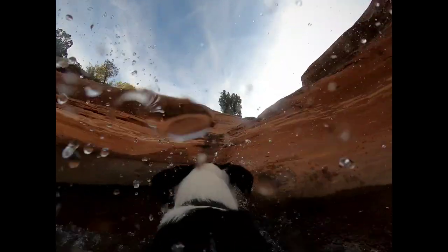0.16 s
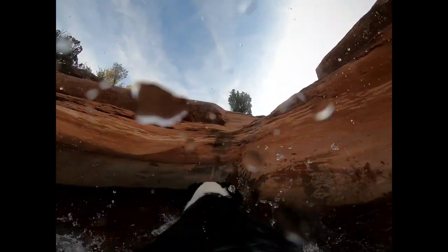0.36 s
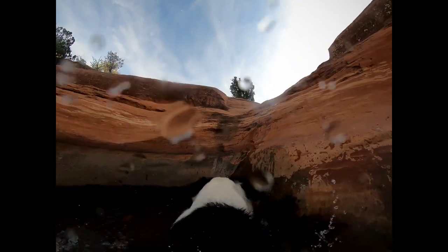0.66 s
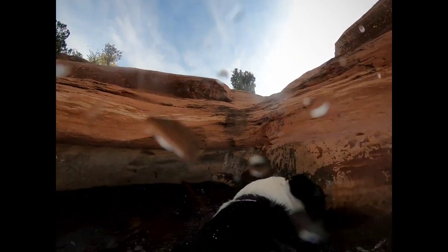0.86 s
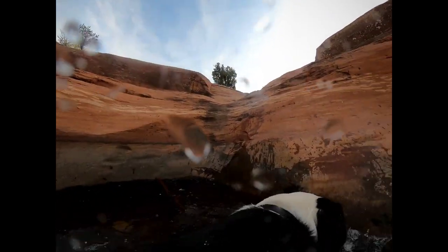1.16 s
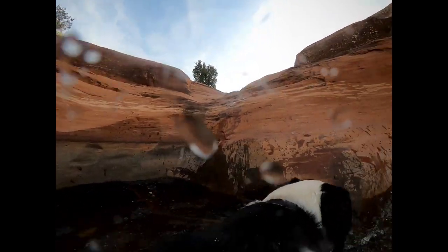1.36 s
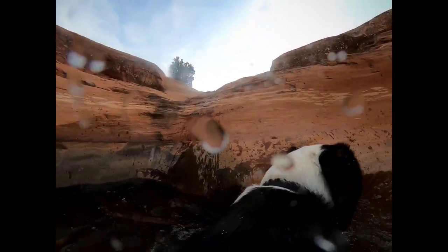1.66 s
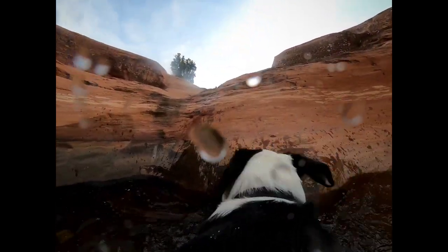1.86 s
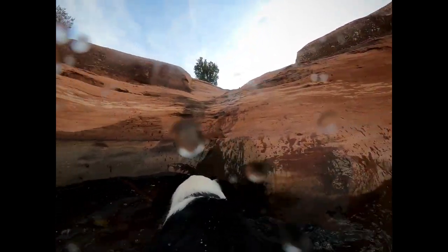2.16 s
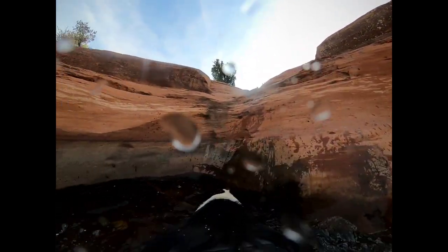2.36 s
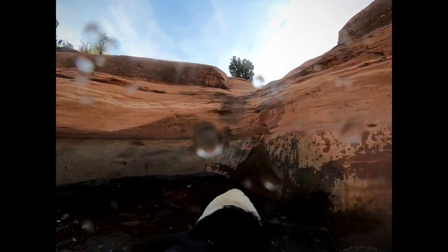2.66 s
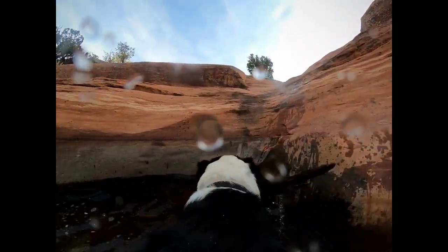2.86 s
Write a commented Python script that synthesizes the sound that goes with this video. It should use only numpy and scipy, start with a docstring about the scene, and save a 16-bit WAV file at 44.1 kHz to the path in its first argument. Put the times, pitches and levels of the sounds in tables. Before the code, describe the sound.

A big close splash as a dog plunges into a rock pool, heavy slaps and spray, then a wet squelch covers the microphone; dull patter fades into soft sloshes, trickles and gurgling bubbles.

```python
"""A dog with a camera on its back plunges into a rock pool: bubbles, fizz and noise crash as spray,
ringing slaps and drops land on top, and low noise buffets the microphone ports.
At 0.72 s a slug of water hits the ports with a squelch, chirp and click, and the crash gives way to dull patter.
The dog then paddles on: swells of slosh, a trickle, and single gliding sines for gurgling bubbles.
Late on, the treble grows wide and in opposite phase at the two ports; a faint drone and hiss lie below."""
import sys
import numpy as np
from scipy.fft import rfft, irfft, next_fast_len
from scipy.io import wavfile
from scipy.ndimage import map_coordinates

SR = 44100
rng = np.random.default_rng(int(sys.argv[2]) if len(sys.argv) > 2 else 0)


def transcribe(u):
    """Save the signal u as a 16-bit wav file named by the first command-line argument.

    u: samples, shape (n,) or (channels, n), limited to [-1, 1]; the rate is SR.
    q: integer samples, one column per channel.
    """
    v = np.clip(np.atleast_2d(u).T, -1, 1)
    q = np.round(v * 32767).astype(np.int16)
    wavfile.write(sys.argv[1], SR, q)


N = 132300
T = np.arange(N) / SR  # s
FLOOD_S, CLOSE_S = 0.7225, 0.0035  # water covers the ports; time scale of their closing
# stereo width of the treble: [t/s, level of the side signal's gain/dB]
WIDTH = [(.1, -12), (.15, -9), (.45, -12), (.69, -18), (.75, -3), (1.0, 0), (1.35, -14), (1.7, -34),
         (2.11, -48.5), (2.16, -12), (2.4, 5), (3, 9)]


def amp(db):
    """Decibels to amplitude."""
    return 10 ** (np.asarray(db) / 20)


def unit(x):
    """x at rms 1."""
    return x / np.sqrt(np.mean(x ** 2) + 1e-20)


def curve(rows, axis=1):
    """One column of a table, drawn as straight lines over time."""
    rows = np.array(rows)
    return np.interp(T, rows[:, 0], rows[:, axis])


def wobble(rate):
    """A smooth random curve with rate random points per second."""
    return map_coordinates(rng.standard_normal(4000), [T * rate + 2], mode="wrap")


def filtered(x, response):
    """x times a response of frequency, padded so that the end does not wrap round."""
    m = next_fast_len(N + SR // 2)
    hz = np.fft.rfftfreq(m, 1 / SR)
    return irfft(rfft(x, m) * response(hz), m)[..., :N]


def coloured(x, points):
    """x through an equaliser curve of (Hz, dB) points, at rms 1."""
    f, db = np.transpose(points)
    return unit(filtered(x, lambda hz: amp(np.interp(np.log(hz + 1), np.log(f), db))))


def noise(points):
    """White noise through an equaliser curve, at rms 1."""
    return coloured(rng.standard_normal(N), points)


def ports(mid, side):
    """Left and right ports: the bass reaches both alike, only the treble parts them."""
    wide_hz = 1160  # the ports differ above this
    right_lean = 0.067  # share of the treble that shifts to the right port
    side = filtered(side + right_lean * mid, lambda hz: 1 - 1 / (1 + (hz / wide_hz) ** 20))
    return np.array([mid - side, mid + side])


def swell(start, length):
    """Rises to 1 in length seconds and dies away."""
    u = np.maximum(T - start, 0) / max(length, 1e-4)
    return (u * np.exp(1 - u)) ** 2


def bubble(start, hz, length, rise, rough=0):
    """A ringing air pocket, its pitch gliding by rise octaves/s; roughness flutters its level and phase."""
    octaves = rise * np.clip(T - start, 0, 4 * length)
    phase = 2 * np.pi * np.cumsum(hz * 2 ** octaves * (T > start)) / SR
    level = swell(start, length)
    if rough:
        # a new random value every four cycles
        size, slip = (np.interp(T * hz / 4, np.arange(4000), rng.standard_normal(4000)) for _ in range(2))
        level = level * (1 + rough * size)
        phase = phase + rough * slip
    return level * np.sin(phase)


def froth(count, low_hz, high_hz, cycles, spread_db, rise):
    """A cloud of small rising bubbles of uneven size, each ringing down over some cycles."""
    when, pitch, size, life = rng.random((count, 4)).T[..., None]
    hz = low_hz * (high_hz / low_hz) ** pitch
    t = np.arange(1600) / SR
    u = t * hz / (cycles * (.5 + life))  # 1 where the ring is 60 dB down
    decay = np.exp(-np.log(1000) * u)
    attack = 1 - np.exp(-t * hz * 2)
    rings = decay * attack * np.sin(2 * np.pi * hz * t * (1 + rise * u))
    rings *= hz * amp(-spread_db * np.log(np.maximum(size, .02)))
    at = (when * N).astype(int) + np.arange(len(t))
    return unit(np.bincount(at.ravel(), rings.ravel(), N)[:N])


def water(colour, grains, noise_db):
    """Bubbles on a bed of rushing noise, at rms 1."""
    return unit(coloured(grains, colour) + amp(noise_db) * noise(colour))


def covered():
    """0 while the ports are open, 1 once water covers them."""
    return .5 + .5 * np.tanh((T - FLOOD_S) / CLOSE_S)


def crash():
    """The plunge throws up water that falls back as large bubbles, fine fizz and spray."""
    # faders before trim: [t/s, body level/dB, spray level/dB]
    faders = [(0.0, -21, -49), (0.064, -19, -42), (0.074, -28.5, -44.5), (0.09, -29, -42.5),
              (0.116, -27, -49), (0.234, -26.5, -37), (0.32, -23.5, -45.5), (0.462, -29, -49.5),
              (0.56, -25, -47.5), (0.645, -31.5, -48), (0.71, -29.5, -53.5)]
    # equaliser of the body: [f/Hz, level/dB]
    body_colour = [(71, -39), (120, -15.5), (156, -3.5), (224, -11.5), (372, -9), (524, -9.5),
                   (1130, -10.5), (1470, -17), (6420, -32.5), (15000, -60.5)]
    # equaliser of the spray: [f/Hz, level/dB]
    spray_colour = [(1500, -36), (3500, 5), (6500, -2.5), (9000, -7), (13000, -20), (15000, -29)]

    def body():
        large = froth(count=5000, low_hz=176.6, high_hz=3460, cycles=38, spread_db=1.5, rise=0.26)
        fizz = froth(count=3600, low_hz=1532, high_hz=11030, cycles=10.9, spread_db=1.5, rise=0.087)
        return water(body_colour, large + amp(0.5) * fizz, noise_db=-3)

    def spray():
        fine = froth(count=5000, low_hz=2940, high_hz=12900, cycles=2, spread_db=2.5, rise=.1)
        return water(spray_colour, fine, noise_db=1.5)

    body_gain = amp(curve(faders) - 0.96)
    spray_gain = amp(curve(faders, axis=2) - 5)
    mid = body_gain * body() + spray_gain * spray()
    side = amp(curve(WIDTH)) * body_gain * body() + amp(-1) * spray_gain * spray()
    return (1 - covered()) * ports(mid, side)


def slaps():
    """Closing cavities thump; the more abrupt the slap, the more it splatters."""
    # heavy slaps of water: [t/s, f/Hz, thump level/dB, swell/s]
    hits = [(0.037, 221, -14, 0.0089), (0.054, 470, -5, 0.0007), (.061, 294, -8.5, 0.0042),
            (.067, 470, -10.5, 0.00066), (0.065, 127, -8.5, 0.0043), (0.309, 155.7, -16.5, 0.012),
            (2.382, 348, -25, 0.0021)]
    splatter_colour = [(80, -9.0), (300, -8.5), (900, 9.0), (2500, -12.5), (9000, -43.0)]  # [f/Hz, level/dB]
    thump = sum(amp(db) * bubble(s, hz, length, rise=3.6) for s, hz, db, length in hits)
    bursts = sum(amp(db) * swell(s, length) / (1 + length / 0.0026) for s, hz, db, length in hits)
    return thump + amp(-10.5) * bursts * noise(splatter_colour)


def buffet():
    """Waves shove each port separately; gentle pressure reaches both more alike."""
    # water pushing on the ports: [t/s, level/dB]
    shove = [(0, -33.5), (.06, -24), (.105, -31.5), (.155, -18.5), (.19, -27), (.228, -11), (.275, -30),
             (.42, -46.5), (.755, -46.5), (.79, -59), (1.5, -76), (1.56, -52), (1.66, -60), (2.58, -54.5),
             (2.645, -44), (2.69, -45), (3, -52.5)]
    # equaliser of the push: [f/Hz, level/dB]
    colour = [(12, -8.5), (25, 2), (42, -6.5), (66, 1.5), (130, -11), (250, -16.5), (600, -45), (1500, -90)]
    level_db = curve(shove)
    apart = np.clip((level_db + 51) / 28, .1, .95)
    own = np.array([noise(colour) for _ in range(2)])
    shared = noise(colour)
    return amp(level_db) * (apart * own + np.sqrt(1 - apart ** 2) * shared)


def flood():
    """A slug of water seals the ports: an opposite-phase squelch and chirp, a click, a push on the right."""
    shut = FLOOD_S + 0.001656
    closing = np.exp(np.minimum(T - shut, 0) / 0.00074 - (np.maximum(T - shut, 0) / 0.00055) ** 2)
    chirp_hz = 1300 + 600 * (T > shut - .0003)
    chirp = amp(-0.5) * closing * np.sin(2 * np.pi * np.cumsum(chirp_hz) / SR)
    squelch_colour = [(900, -18.0), (1200, 4.5), (1600, -10.5), (3000, -15.0), (6000, -56.5)]  # [f/Hz, level/dB]
    squelch = amp(-18.5) * np.exp(-abs(T - shut) / 0.0082) * noise(squelch_colour)
    click = amp(-10.5) * (swell(shut - .0003, .0001) - swell(shut, .0001))
    push = amp(-3) * bubble(shut + 0.000058, 120, 0.003, rise=-33)
    push += amp(-8.5) * bubble(shut - .012, 53, 0.01, rise=0)
    return np.array([click - chirp - squelch, click + chirp + squelch + push])


def wash():
    """The last falling water, a short drizzle and the slosh of the strokes, dull through wet ports."""
    # muffled falling water, fader before trim: [t/s, level/dB]
    fader = [(.74, -51), (.8, -48.5), (.94, -46), (.99, -49.5), (1.04, -49), (1.11, -51), (1.3, -50),
             (1.47, -57), (1.51, -51), (1.56, -65), (1.61, -55.5), (1.7, -80), (2.4, -77.5)]
    # equaliser of the falling water: [f/Hz, level/dB]
    patter_colour = [(200, -1.5), (500, -3), (900, -2), (1250, -5), (1480, -14.5), (1900, -8),
                     (2600, -18.5), (3200, -14.5), (4500, -27.5), (8000, -37.5), (11000, -52)]
    # low sloshes of the paddling: [t/s, level/dB, swell/s]
    paddling = [(.76, -69.5, 0.11), (1.2, -47.5, 0.05), (1.385, -53.5, 0.034), (1.49, -47, 0.021),
                (1.64, -56, 0.032), (1.754, -55.5, 0.025), (1.883, -52.5, 0.019), (2.036, -54, 0.011),
                (2.15, -55, 0.03), (2.358, -46, 0.023), (2.59, -32.5, 0.021), (2.808, -44, .018),
                (2.96, -43, 0.054)]
    # equaliser of the slosh: [f/Hz, level/dB]
    slosh_colour = [(60, -37.5), (160, -5), (300, -4), (500, -14.5), (900, -20), (2000, -63)]
    # equaliser of the drizzle: [f/Hz, level/dB]
    drizzle_colour = [(1000, -19), (2000, -6), (3800, 0), (11000, -35)]

    gain = covered() * amp(curve(fader) - 3.0)
    drizzle_gain = amp(-61.0) * np.exp(-((T - FLOOD_S - .095) / 0.075) ** 2)

    def falling():
        drops = froth(count=4000, low_hz=392.4, high_hz=2530, cycles=25.5, spread_db=3.5, rise=0.22)
        patter = water(patter_colour, drops, noise_db=-6.5)
        return gain * patter + drizzle_gain * noise(drizzle_colour)

    churn = froth(count=600, low_hz=147.7, high_hz=909, cycles=11.0, spread_db=3.0, rise=0.21)
    slosh = water(slosh_colour, churn, noise_db=1.5)
    strokes = sum(amp(db) * swell(s, length) for s, db, length in paddling)
    return ports(falling() + strokes * slosh, amp(curve(WIDTH)) * falling())


def gurgles():
    """Trickling water, falling drops and single bubbles close to the camera."""
    # trickle off the paddling dog: [t/s, level/dB]
    fader = [(1.9, -71), (2.14, -63.5), (2.175, -51), (2.23, -64), (2.33, -73.5), (2.39, -49.5),
             (2.44, -62.5), (2.475, -55.5), (2.545, -64), (2.62, -58), (2.665, -57), (2.76, -53.5),
             (2.83, -52.5), (2.91, -60.5), (3, -44.5)]
    # equaliser of the trickle: [f/Hz, level/dB]
    colour = [(250, -9), (700, 2.5), (1200, 4.5), (2000, 1.5), (3200, -7), (5000, -17), (8500, -23.5),
              (15000, -46.5)]
    # single bubbles: [t/s, f/Hz at the start, level/dB, swell/s, rise/(octaves per s)]
    pockets = [(1.034, 784, -39, 0.0087, 1.6), (1.278, 290.7, -32.5, 0.0059, 23.8),
               (1.35, 1030, -39.5, 0.0064, 0.72), (1.616, 502.6, -47, 0.0058, 3.7),
               (1.915, 1120, -51.5, 0.01, 4.6), (1.952, 1000, -57.5, 0.011, 5),
               (2.158, 1235, -43.5, 0.007, 0.91), (2.363, 291, -41, 0.0071, 3.8),
               (2.390, 626, -36.5, 0.0084, 7.4), (2.469, 928, -40.5, 0.0034, 6.4),
               (2.475, 2390, -45.5, 0.0034, 19), (2.564, 297.4, -34.5, 0.0045, 3.1),
               (2.6029, 330, -17, 0.0043, 1.1), (2.6205, 990, -29.5, 0.0013, 12),
               (2.635, 1130, -42, 0.0035, 8), (2.632, 1430, -49, 0.011, 16),
               (2.679, 1274, -42.5, 0.0079, 22), (2.692, 357, -39.5, 0.012, 7),
               (2.725, 660, -41.5, 0.016, 7.5), (2.768, 804, -34.5, 0.0025, 4.4),
               (2.926, 334, -31.5, 0.0016, 4.5), (2.970, 483, -35, 0.0063, 4.8)]

    def trickle():
        drops = froth(count=3000, low_hz=395.5, high_hz=5510, cycles=31.5, spread_db=4.5, rise=0.17)
        return water(colour, drops, noise_db=-3)

    gain = amp(curve(fader))
    near = impacts()
    for s, hz, db, length, rise in pockets:
        near = near + amp(db) * bubble(s, hz, length, rise, rough=min(length / 0.015, .6))
    centre, apart = trickle(), trickle()
    side = near + gain * (0.47 * centre + 0.71 * apart)
    return ports(near + gain * centre, amp(curve(WIDTH)) * side)


def impacts():
    """Each drop hits abruptly, then splatters and rings around its own pitch."""
    # drops and lumps of water landing, level before trim: [t/s, f/Hz, level/dB, swell/s]
    landings = [(0.0227, 1574, -20, 0.0024), (.030, 1400, -13.5, 0.0014), (0.068, 1980, -14.5, 0.00095),
                (0.1438, 1170, -15.5, .0016), (.189, 1364, -23.5, 0.0067), (.3485, 680, -16, 0.0029),
                (.505, 615, -18, 0.0034), (.598, 1040, -18, 0.002), (.655, 1850, -29.5, 0.0031),
                (0.679, 950, -26, 0.003), (.816, 1770, -40, .0025), (.940, 1013, -36, 0.0029),
                (1.271, 1030, -39, 0.0028), (2.384, 1326, -43.5, 0.0042), (2.383, 3130, -47, 0.00303),
                (2.471, 1164, -41, 0.0039), (2.587, 750, -36, 0.0024), (2.611, 1135, -44, .003),
                (2.636, 1700, -57, 0.0029), (2.709, 1250, -42, 0.0017), (2.562, 1100, -46.5, 0.0018),
                (2.757, 1160, -35, 0.0014), (2.756, 3800, -51, 0.00064), (2.771, 1880, -37.5, 0.0011),
                (2.8045, 2620, -38, 0.0014), (2.819, 1470, -42.5, 0.0018)]
    out = np.zeros(N)
    for s, hz, db, length in landings:
        t = np.maximum(T - s, 0)
        splatter = noise([(hz / 4, -14), (hz, 0), (hz * 2, -7), (hz * 10, -56)])
        burst = (1 - np.exp(-t / 0.00043)) * np.exp(-t / (2 * length))
        ring = bubble(s, hz, length, rise=5)
        out += amp(db) * (amp(-6) * burst * splatter + amp(-1.5) * ring)
    return out


def background():
    """Low air rumble and thin hiss as shaped noise, and a drone of sines wavering in level and phase."""
    # partials of the drone before its fader and wavering: [f/Hz, level/dB]
    drone = [(78, -59.5), (158, -67), (243, -67.5)]
    # equaliser of rumble and hiss: [f/Hz, level/dB]
    floor_colour = [(20, 8.5), (90, -7.5), (220, -3), (500, -34.5), (3500, -22), (6000, -57.5),
                    (10000, -63), (12500, -31)]
    hum = 0
    for hz, db in drone:
        level = amp(db + 2.6 * wobble(9))
        hum = hum + level * np.sin(2 * np.pi * hz * T + 0.55 * wobble(5.7))
    fader = amp(curve([(1.25, -12.5), (1.55, 0.5)]))  # [t/s, level/dB]
    return hum * fader + amp(-62) * noise(floor_colour)


def scene():
    """All layers together, left and right."""
    return crash() + wash() + gurgles() + buffet() + slaps() + flood() + background()


def record(dry):
    """The camera clips at full scale and keeps nothing above its band limit."""
    top_hz = 15500
    return filtered(np.clip(dry, -1, 1), lambda hz: hz < top_hz)


dry = scene()
out = record(dry)
transcribe(out)
```